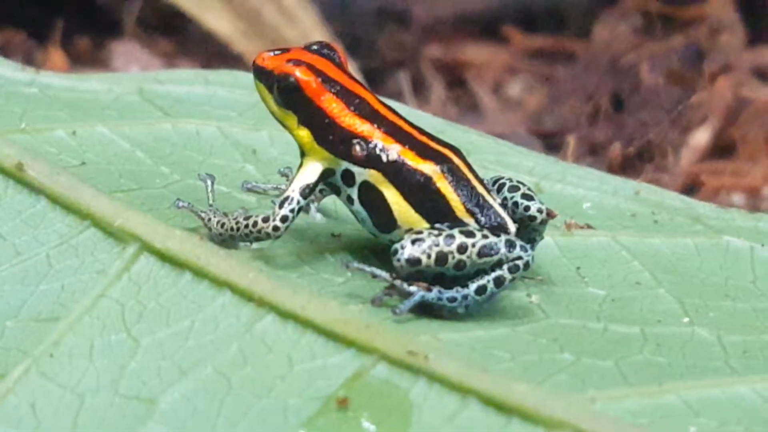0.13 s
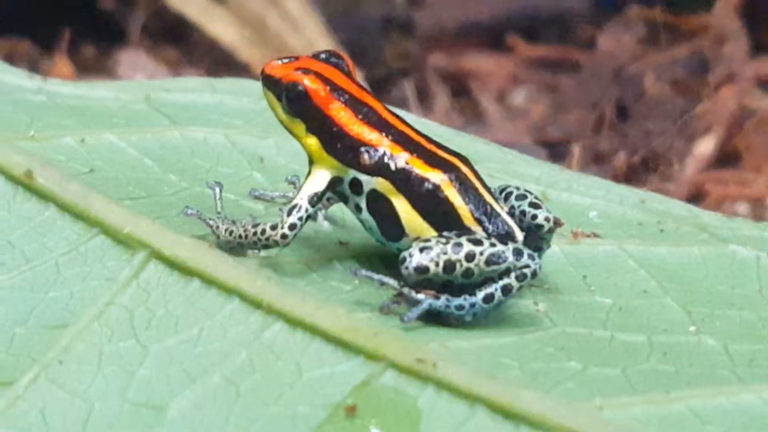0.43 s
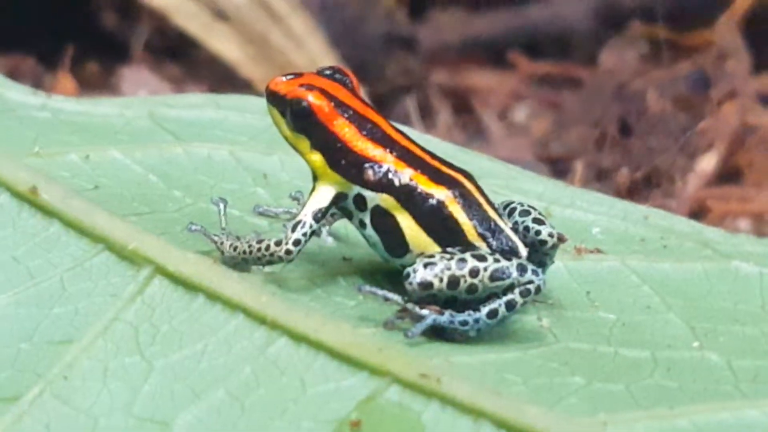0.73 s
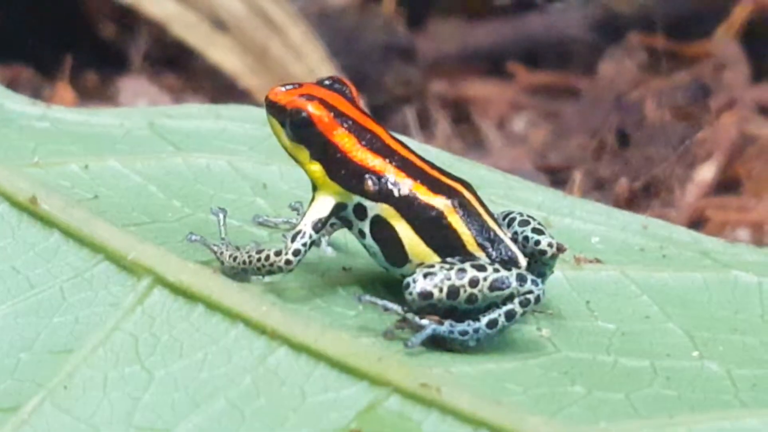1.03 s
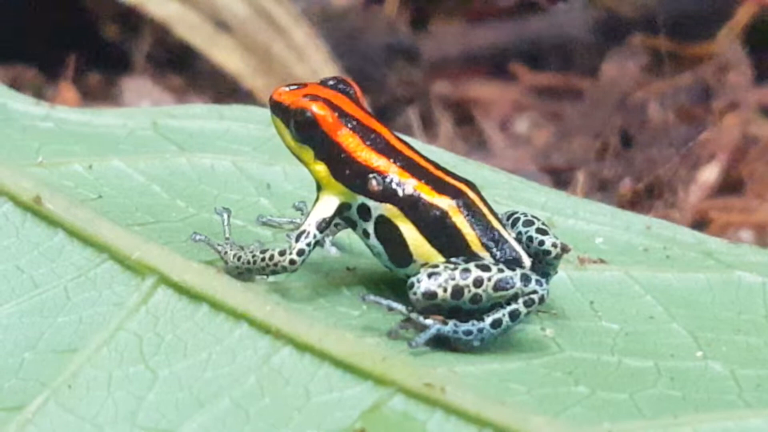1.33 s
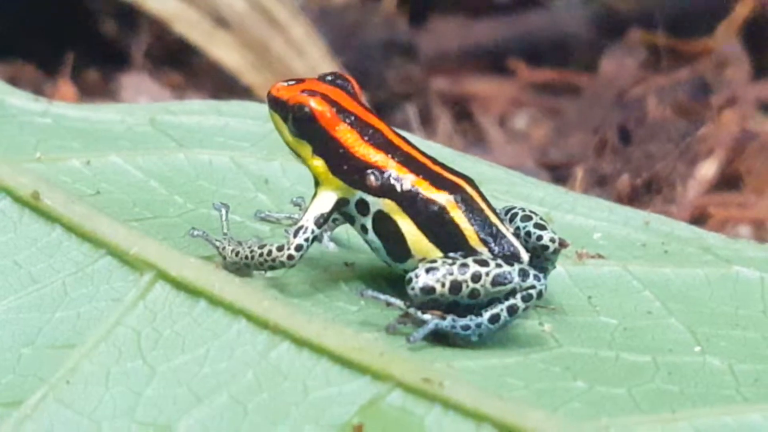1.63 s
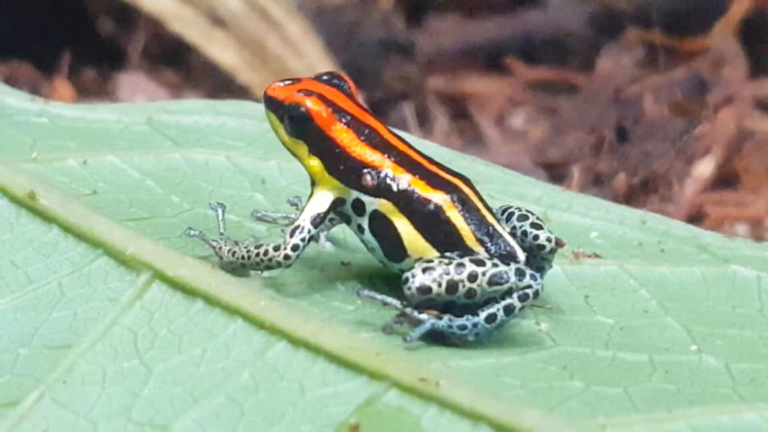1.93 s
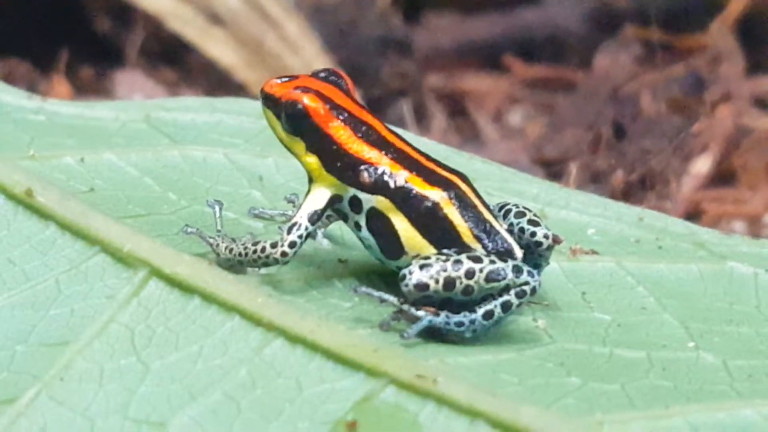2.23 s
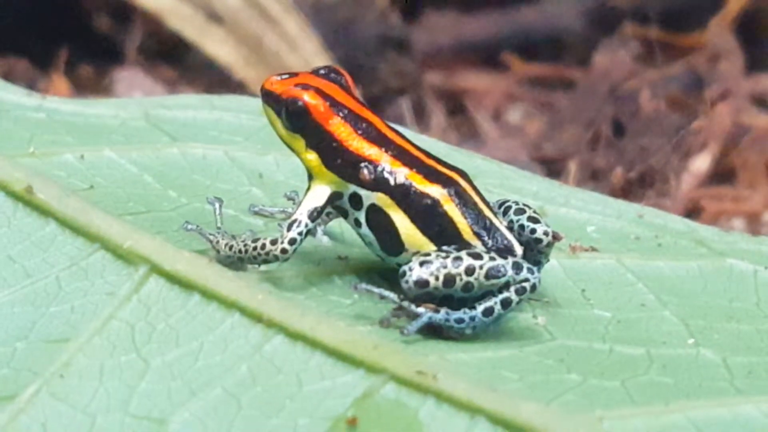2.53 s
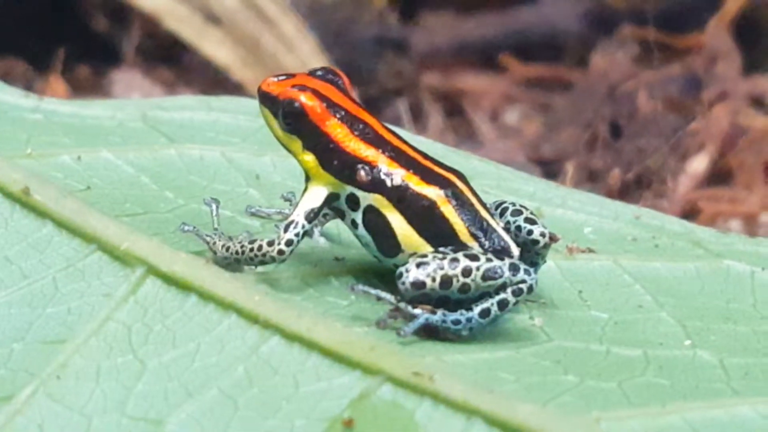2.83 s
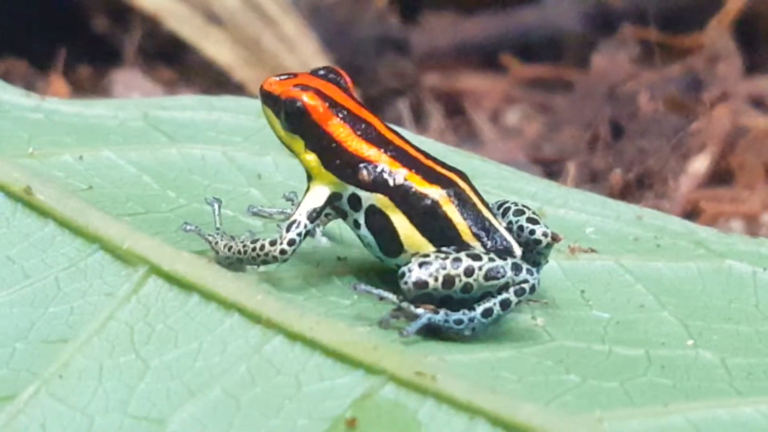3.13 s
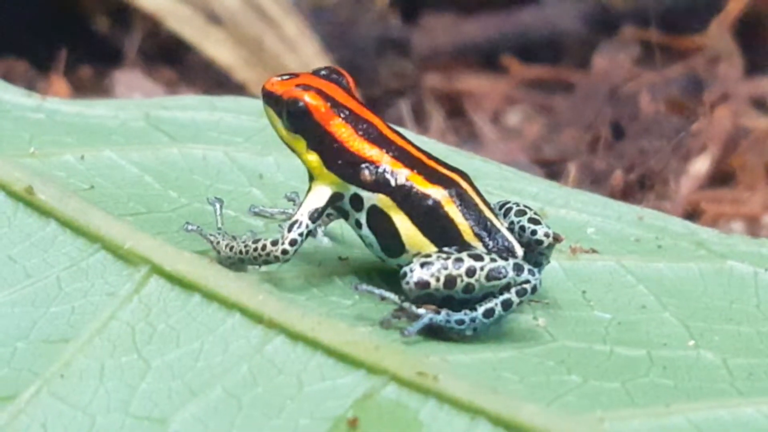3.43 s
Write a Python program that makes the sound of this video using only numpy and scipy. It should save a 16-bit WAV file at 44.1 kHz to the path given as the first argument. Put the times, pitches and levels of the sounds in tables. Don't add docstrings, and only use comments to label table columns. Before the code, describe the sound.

Cricket trills in evenly spaced bursts, close and left, echoing softly among leaves and trunks; behind it a continuous high insect band, short buzzes, a fainter answering cricket, sparse drips and bumps, and low right-side wind rumble.

```python
import sys
import numpy as np
from scipy import signal
from scipy.fft import rfft, irfft, next_fast_len
from scipy.io import wavfile
from scipy.ndimage import uniform_filter1d

SR = 44100
rng = np.random.default_rng(int(sys.argv[2]) if len(sys.argv) > 2 else 0)


def invert_db(level):
    return 10 ** (np.asarray(level, dtype=float) / 20)


def transcribe(u):
    v = np.clip(np.atleast_2d(u).T, -1, 1)
    q = np.round(v * 32767).astype(np.int16)
    wavfile.write(sys.argv[1], SR, q)


N = 157437


def read(points, hz):
    f, value = np.transpose(points)
    return np.interp(np.log(hz + 1), np.log(f + 1), value)


def evened(x):
    return x / np.sqrt(np.mean(x ** 2) + 1e-20)


def add(mix, s, sound):
    at = round(s * SR)
    sound = sound[..., max(-at, 0):]
    part = mix[..., max(at, 0):][..., :sound.shape[-1]]
    part += sound[..., :part.shape[-1]]


def band(x, hz, width, order=4):
    size = next_fast_len(N)
    off = (np.fft.rfftfreq(size, 1 / SR) - hz) / (width / 2)
    return irfft(rfft(x, size) / (1 + off ** order), size)[..., :N]


def resonate(x, hz, width):
    turn = np.exp(2j * np.pi * np.cumsum(hz * np.ones(x.shape[-1])) / SR)
    r = np.exp(-np.pi * width / SR)
    smooth = signal.lfilter([(1 - r) ** 2], [1, -2 * r, r * r], x / turn)
    return 2 * (turn * smooth).real


def wood(x, t60):
    t = np.arange(SR // 4) / SR
    sparse = rng.random((2, len(t))) < .06
    taps = rng.standard_normal((2, len(t))) * sparse * invert_db(-60 * t / t60) * (t > .003)
    taps = taps / np.linalg.norm(taps, axis=1)[:, None]
    return signal.oaconvolve(np.atleast_2d(x), taps, axes=1)[:, :N]


def ticks(per_s, uneven):
    waver = evened(uniform_filter1d(rng.standard_normal(N), 400))
    pace = per_s * (1 + uneven * waver)
    clicks = np.diff(np.floor(np.cumsum(pace) / SR), prepend=0)
    return clicks * invert_db(2.5 * rng.standard_normal(N))


def hiss_and_rumble():
    # pitch_hz, level_db per Hz
    hiss = [(28, -43), (60, -9.5), (130, -3), (500, -12), (1500, -13.5), (4500, -21), (8100, -44),
            (10000, -63)]
    # pitch_hz, level_db per Hz
    rumble_colour = [(28, -42), (60, -4.5), (130, 1.5), (300, -5), (800, -14.5), (2000, -26), (5000, -45.5)]
    # shuts_s, lets_go_s
    shut = [
        (.485, 0.674),
        (1.862, 1.942),
    ]
    shut_hz, slide_s, open_hz = 1900, .043, 16
    hiss_db, rumble_db, patchy_db = [[-61], [-62.5]], -49, 1.2
    frames = N // 256 + 6
    hz = np.fft.rfftfreq(1024, 1 / SR)[:, None]
    t = np.arange(frames) * 256 / SR - .01
    a, b, patches = rng.standard_normal((frames, 513, 3, 3)).T
    patches = evened(uniform_filter1d(uniform_filter1d(patches, 10, 1), 12, 2))
    edge = open_hz + sum(shut_hz * (t > s) * np.exp(-np.maximum(t - go, 0) / slide_s) for s, go in shut)
    colour = invert_db([read(hiss, hz), read(hiss, hz), read(rumble_colour, hz)]) * invert_db(patchy_db * patches)
    z = (a + 1j * b) * colour / np.sqrt((colour ** 2).mean((1, 2)))[:, None, None]
    z[2] /= np.sqrt(1 + (edge / (hz + 1)) ** 6)
    z[1] /= np.sqrt(1 + (0.05 * edge / (hz + 1)) ** 2)
    left, right, rumble = signal.istft(z, nperseg=1024, noverlap=768)[1][:, :N]
    unit = np.sqrt(np.mean(left ** 2))
    both_hiss = np.array([left, right]) / unit * invert_db(hiss_db)
    return both_hiss + [[0], [1]] * rumble / unit * invert_db(rumble_db)


def air():
    return invert_db(-78.5) * evened(band(rng.standard_normal((2, N)), 13900, 3500, order=12))


def chorus():
    # pitch_hz, width_hz, ticks_per_s, level_db, left_over_right_db
    singers = [
        (5660, 1070, 90, -68, 14),
        (6065, 870, 120, -65.5, 4.5),
        (6900, 650, 120, -68, 7.5),
        (7436, 760, 85, -64.5, -2),
        (8800, 1240, 100, -79, -1.5),
        (12000, 3200, 180, -86, 19),
    ]
    out = np.zeros((2, N))
    for hz, width, per_s, db, pan_db in singers:
        swell = evened(uniform_filter1d(uniform_filter1d(rng.standard_normal(N), 4000), 3000))
        singer = evened(band(ticks(per_s, .12), hz, width, order=8)) * invert_db(db + 0.97 * swell)
        out += wood(singer, .13) * invert_db([[pan_db / 2], [-pan_db / 2]])
    return out


def chirps():
    # start_s, length_s, level_db, pitch_hz
    buzzes = [(0.003, 0.038, -63.5, 7380), (0.265, 0.13, -61.5, 7190), (0.664, 0.083, -66.5, 7120),
              (1.247, 0.184, -62, 7150), (1.643, 0.09, -70, 7500), (1.864, 0.11, -64.5, 7190),
              (2.203, 0.13, -64, 7120), (2.56, 0.066, -63, 7180), (2.95, 0.037, -68, 7270),
              (3.098, 0.092, -65, 7140), (3.323, 0.087, -61.5, 7120)]
    per_s, width_hz, wet_db, edge_s = 204, 310, 8, .048
    t, train, buzz = np.arange(N) / SR, ticks(per_s, .04), np.zeros(N)
    for start, length, db, hz in buzzes:
        part = slice(max(round((start - .05) * SR), 0), round((start + length + 0.063) * SR))
        to_edge = np.minimum(t[part] - start, start + length - t[part])
        shape = np.clip(to_edge / edge_s + 0.47, 0, 1)
        buzz[part] += invert_db(db) * shape * evened(resonate(train[part], hz, width_hz))
    return invert_db(-31) * buzz * np.array([[1], [-1]]) + invert_db(wet_db) * wood(buzz, 0.051)


def rustles():
    # start_s, length_s, pitch_hz, level_db
    swishes = [
        (2.417, .16, 12500, -74),
        (2.658, 0.11, 11500, -72.5),
    ]
    t, noise = np.arange(N) / SR, rng.standard_normal((2, N))
    out = np.zeros((2, N))
    for s, length, hz, db in swishes:
        shape = np.sin(np.pi * np.clip((t - s) / length, 0, 1))
        out += invert_db(db) * evened(band(noise, hz, 2400)) * shape
    return out


def midge():
    # time_s, wingbeat_hz, level_db
    flight = [(0, 460, -97), (.2, 473, -68), (.5, 456, -69.5), (.7, 450, -106), (1.4, 478, -77),
              (1.55, 478, -69), (1.85, 464, -67), (2.0, 488, -89), (2.8, 483, -73.5), (3.0, 462, -73),
              (3.57, 486, -72.5)]
    harmonics_db, blur_hz = [3.5, -2, -4, -3], 28
    s, hz, db = np.transpose(flight)
    t, noise = np.arange(N) / SR, rng.standard_normal(N)
    wingbeat = np.interp(t, s, hz)
    hum = sum(invert_db(top_db) * evened(resonate(noise, k * wingbeat, blur_hz * k))
              for k, top_db in enumerate(harmonics_db, 1))
    return hum * invert_db(np.interp(t, s, db)) * invert_db([[0], [-12]])


def stroke(length, hz, sag_hz, drop_hz, octave_db):
    drop_power, rise, fall = 4.2, .22, .11
    u = np.arange(0, length, 1 / SR) / length
    turns = np.cumsum(hz - sag_hz * u - drop_hz * u ** drop_power) / SR
    tone = np.sin(2 * np.pi * turns)
    octave = invert_db(octave_db - 5.3 * u ** 9.0) * np.sin(4 * np.pi * turns)
    shape = np.sin(np.pi / 2 * np.minimum(u / rise, 1)) * np.minimum((1 - u) / fall, 1)
    return np.sqrt(2) * np.array([tone, octave]) * shape


def far_cricket():
    # start_s, length_s, level_db
    answers = [
        (0.443, 0.41, -65),
        (1.451, 0.45, -59.5),
        (2.494, .5, -61),
        (3.453, .2, -53.5),
    ]
    pitch_hz, drop_hz, per_s, pan_db, wet_db, octave_db = 6026, 500, 64, -19, .5, -30.5
    dry, chance = np.zeros(N), rng.standard_normal((len(answers), 60, 2))
    for (start, length, db), row in zip(answers, chance):
        for k in range(int(length * per_s)):
            one = stroke(0.67 / per_s, pitch_hz + 30 * row[k, 0], 137, drop_hz, octave_db).sum(0)
            add(dry, start + k / per_s, invert_db(db + 0.5 * row[k, 1]) * one)
    return (invert_db(2.5) * dry + invert_db(wet_db) * wood(dry, 0.1)) * invert_db([[0], [pan_db]])


def bumps():
    # start_s, peak_db, pitch_hz, left_over_right_db, length_s
    knocks = [(0.182, -45.5, 247, 0, 0.0091), (0.37, -40, 184, 14, 0.018), (0.422, -36.5, 294, -26, 0.0079),
              (0.469, -37.5, 500, -26, 0.0051), (.472, -33.5, 840, -34, .013),
              (0.492, -39.5, 1360, -24, 0.0043), (0.515, -62, 880, -24, 0.0034),
              (0.547, -44.5, 355, -32, 0.0093), (.61, -45.5, 185, -26, 0.022), (.611, -45, 2380, -42, .02),
              (0.835, -60, 614, 13, 0.0035), (1.227, -50, 210, 2, 0.013), (1.3, -40.5, 150, 4, .016),
              (1.839, -31.5, 127, -35, 0.012), (1.847, -40, 740, -35, 0.013),
              (2.85, -41.5, 1750, 12, 0.0074), (2.851, -57, 3200, 10, 0.0054), (3.459, -48, 1530, 8, .004),
              (3.533, -45, 4000, 16, 0.0038)]
    crackle_gain, crackle_hz = .27, 3000
    out, chance = np.zeros((2, N)), rng.standard_normal((len(knocks), 2, 2048))
    for (s, db, hz, pan_db, length), (noise, grit) in zip(knocks, chance):
        u = np.arange(2048) / SR / length
        push = noise ** 2 * np.sign(noise) * (u < 1) * 0.29 + (u == 0) * 2.5
        climb = (1.3 if hz < 1000 else .15) * (hz > 500)
        ring = resonate(push, hz * (1 + climb * np.minimum(u, 1.1) ** 2), 0.86 * hz + 40)
        lowpass = signal.butter(2, max(crackle_hz, 2 * hz), fs=SR)
        crackle = signal.lfilter(*lowpass, grit * (u < 1.1) * (1 - .5 * u))
        sound = ring / abs(ring).max() + crackle_gain * (hz > 280) * crackle / abs(crackle).max()
        add(out, s, sound * invert_db([[db + min(pan_db, 0)], [db - max(pan_db, 0)]]))
    return out


def cricket():
    # first_stroke_end_s, stroke_period_s, strokes
    trills = [
        (.0488, .01965, 26),
        (1.081, .01962, 26),
        (2.0865, .0197, 27),
        (3.1102, .01969, 25),
    ]
    trill_db = [-40.5, -41, -41.5, -41.5]
    echo_s = [.0021, .0042, .007, .0098, .012, .01505, .0172, .0212, .0303]
    # left_db, right_db
    echoes = [(-13, -18), (-13, -20), (-20, -20), (-12, -23), (-20, -19), (-7, -25), (-16, -25), (-20, -22),
              (-16, -25)]
    # left_db, right_db
    octave_wet_db = [
        [5],
        [-5],
    ]
    lead_s, short_s, long_s, grow, jitter_s = .0455, .013, .014, 3.0, .0001
    start_hz, sag_hz, drop_hz, scatter_hz = 5920, 310, 690, 12
    swell_db, octave_db = 1.5, -29.5
    direct_db, wood_db, wood_t60 = [[0], [-30]], [[-11], [-15]], .3
    both, chance = np.zeros((2, N)), rng.standard_normal((len(trills), 30, 3))
    for (end, period, count), db, row in zip(trills, trill_db, chance):
        for k in range(-1, count):
            warm = 1 - np.exp(-max(k, 0) / grow)
            length = short_s + (long_s - short_s) * warm
            stroke_end = end + (k * period if k >= 0 else -lead_s)
            s = stroke_end - length + jitter_s * row[k, 0]
            gain = invert_db(db + swell_db * (k / count - 2.5) + 0.27 * row[k, 2])
            hz = start_hz - 40 * (1 - warm) + scatter_hz * row[k, 1]
            add(both, s, gain * stroke(length, hz, sag_hz, drop_hz, octave_db - 8 * (1 - warm)))
    dry, octave = both
    out = dry * invert_db(direct_db) + invert_db(wood_db) * wood(dry, wood_t60)
    out += octave * invert_db([[-3], [-12]]) + invert_db(octave_wet_db) * wood(octave, .1)
    add(out[0], .01505, invert_db(-6) * band(dry, 5850, 380, order=2))
    for s, (left_db, right_db) in zip(echo_s, echoes):
        add(out, s, dry * invert_db([[left_db], [right_db]]))
    return out


def scene():
    background = hiss_and_rumble() + air() + chorus()
    small_life = chirps() + rustles() + midge()
    return background + small_life + far_cricket() + bumps() + cricket()


def band_limit(x):
    return signal.sosfilt(signal.butter(12, 15640, fs=SR, output="sos"), x)


def record(dry):
    return band_limit(dry - .0006)


dry = scene()
out = record(dry)
transcribe(out)
```